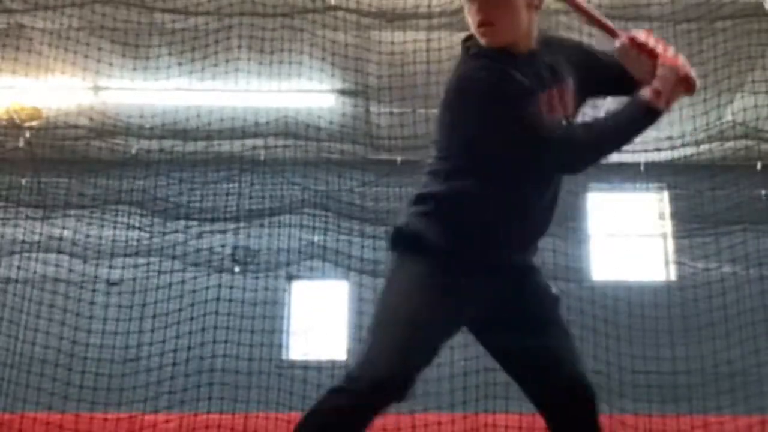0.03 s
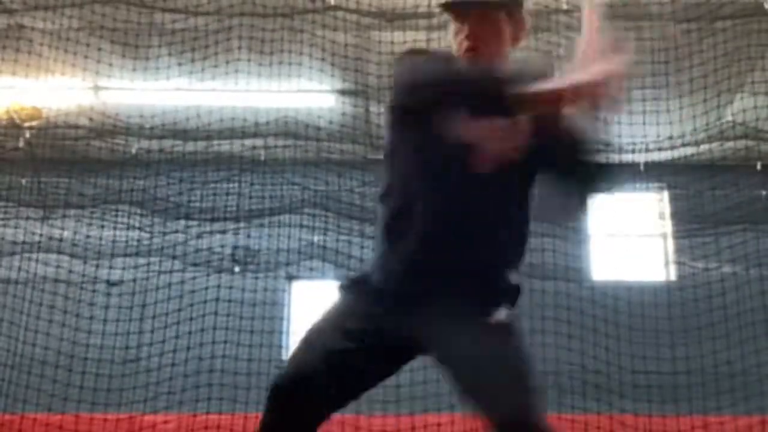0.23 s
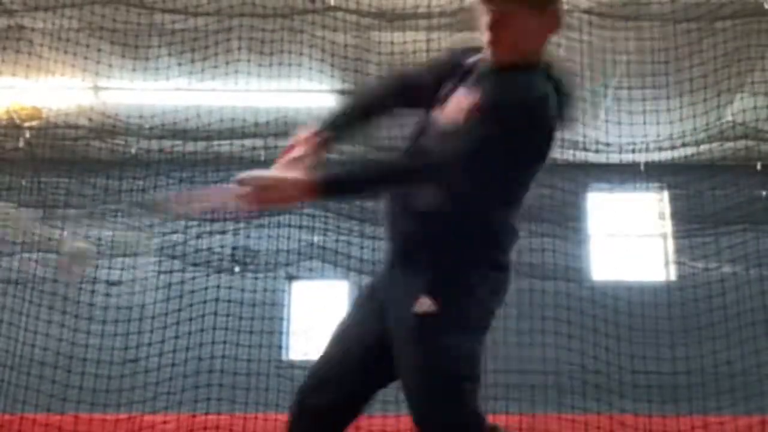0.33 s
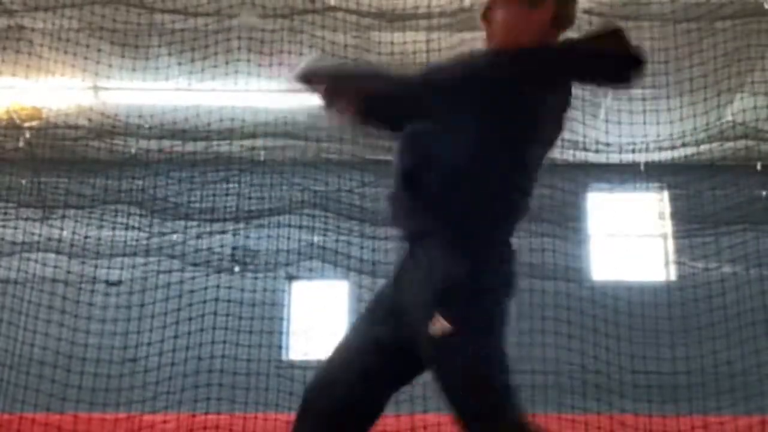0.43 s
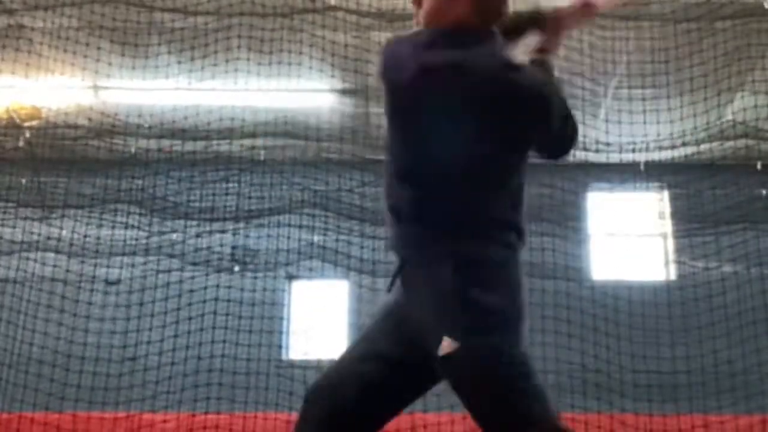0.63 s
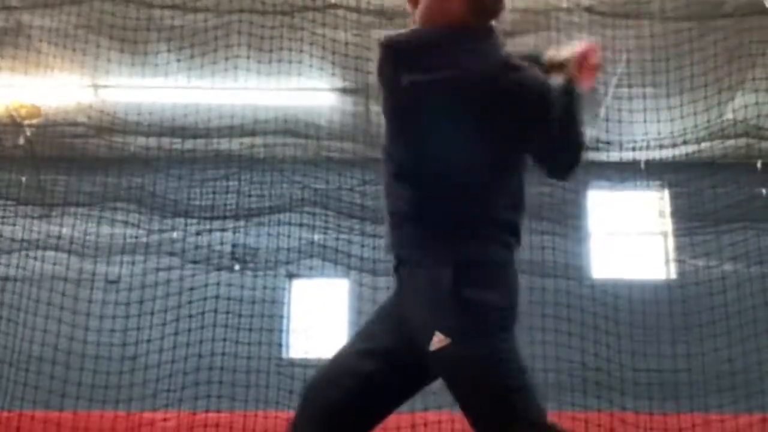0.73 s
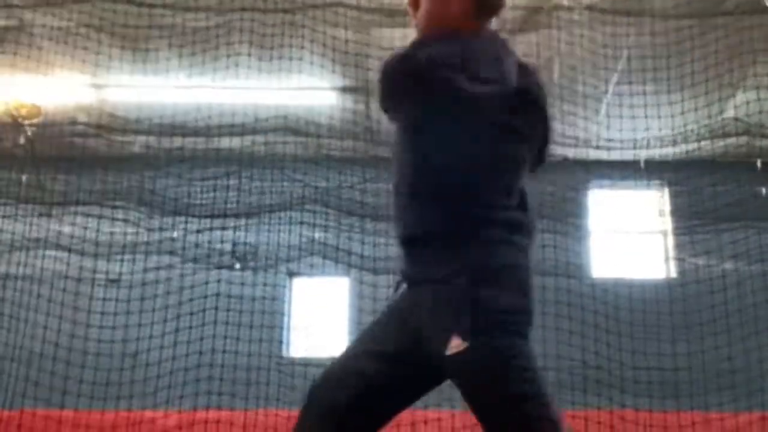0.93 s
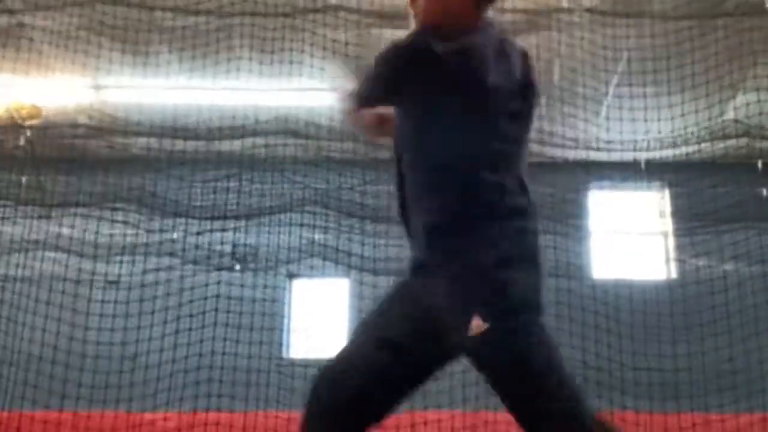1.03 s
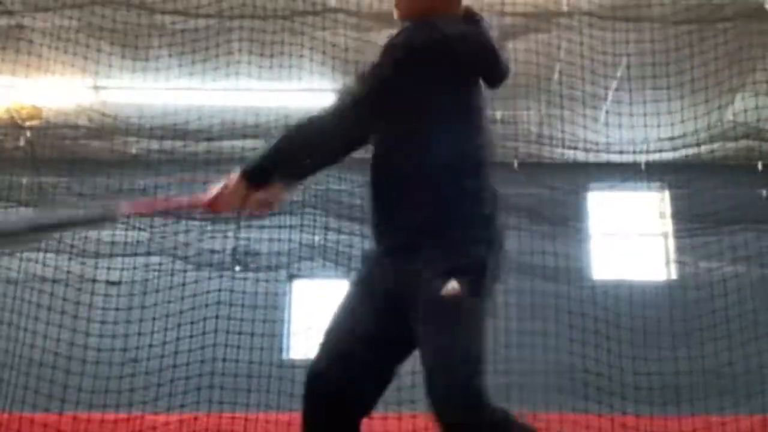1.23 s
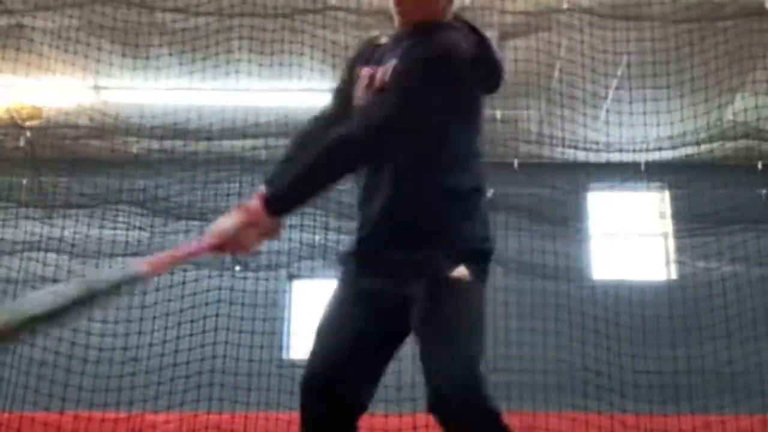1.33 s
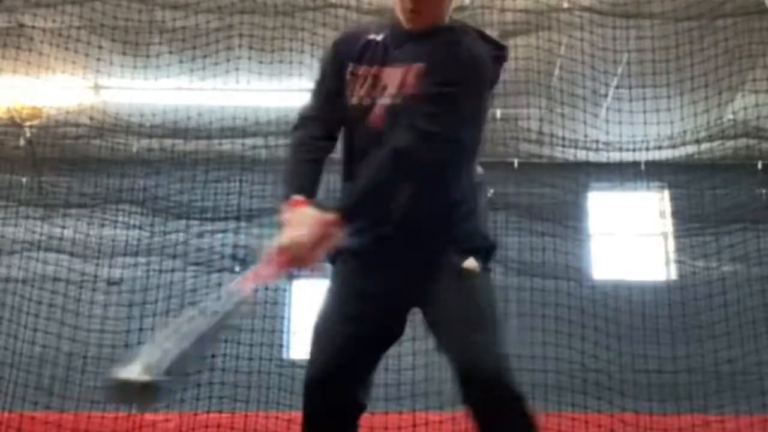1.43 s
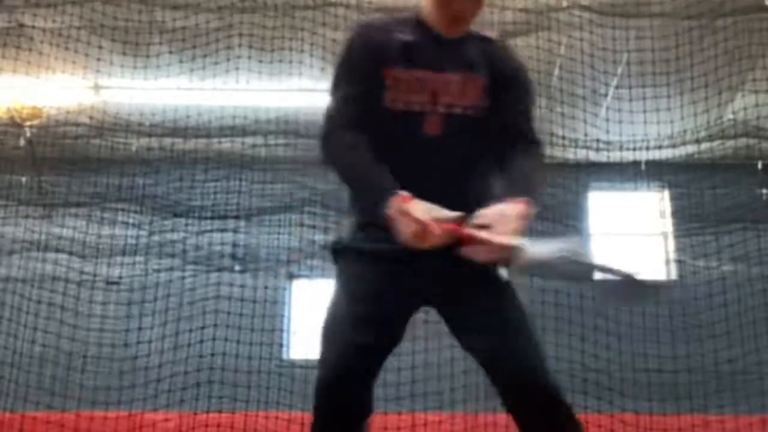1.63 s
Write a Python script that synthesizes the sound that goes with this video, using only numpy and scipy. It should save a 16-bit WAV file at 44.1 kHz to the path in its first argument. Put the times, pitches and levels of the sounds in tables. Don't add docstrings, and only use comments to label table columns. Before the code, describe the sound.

A bat cracks sharply against a ball in a netted indoor cage, ringing through the hall

```python
import sys
import numpy as np
from scipy import signal
from scipy.fft import rfft, irfft, next_fast_len
from scipy.io import wavfile

SR = 44100
rng = np.random.default_rng(int(sys.argv[2]) if len(sys.argv) > 2 else 0)


def bounce(signal):
    frames = np.transpose(np.atleast_2d(signal))
    limited = np.clip(frames, -1, 1)
    pcm = np.round(limited * 32767).astype(np.int16)
    wavfile.write(sys.argv[1], SR, pcm)


def volts_from_db(level):
    exponent = np.asarray(level, float) / 20
    return 10 ** exponent


N = 74970


def at_hz(points, hz):
    curve_hz, value = np.transpose(points)
    return np.interp(np.log(hz), np.log(curve_hz), value)


def drift(rate_hz):
    hop = 40
    pole = np.exp(-2 * np.pi * rate_hz * hop / SR)
    noise = rng.standard_normal(N // hop + 2002)
    slow = signal.lfilter([1], [1, -2 * pole, pole * pole], noise)[2000:]
    return np.interp(np.arange(N) / hop, np.arange(len(slow)), slow / slow.std())


def banded_noise(spectrum, patchy_db, envelope):
    # (frequency [Hz], correlation [-1..1])
    ear_likeness = [(60, 0.99), (180, 1), (550, 0.47), (1650, 0.21), (4970, -0.31), (15000, 0.53)]
    # (frequency [Hz], level [dB])
    ear_balance = [(60, -2), (180, 1.5), (550, 2), (1650, 3), (4970, 2), (15000, -2)]
    out, power = 0, 0
    edges = 22 * 2 ** np.arange(0, 9.6, 0.5)
    white = rng.standard_normal((2, 2, N + 4000))
    common_flicker = drift(4.7)
    for k, (low, high) in enumerate(zip(edges, edges[1:])):
        band = signal.butter(2, [low, high], "band", fs=SR, output="sos")
        mid, side = signal.sosfilt(band, white[k % 2])[:, 4000:]
        hz = np.sqrt(low * high)
        alike = np.clip(at_hz(ear_likeness, hz), -1, 1)
        level = volts_from_db(at_hz(spectrum, hz))
        power += level ** 2 * (high - low) * 2 / SR
        lean = volts_from_db(at_hz(ear_balance, hz) * np.array([[0.5], [-0.5]]))
        flicker = volts_from_db(patchy_db * (0.26 * common_flicker + drift(68)))
        stereo = np.sqrt(1 + alike) * mid + np.sqrt(1 - alike) * side * [[1], [-1]]
        out = out + level * envelope(hz) * flicker * lean * stereo
    return out / np.sqrt(power)


def blows(rows, rough, apart, share=0.13):
    length = 8192
    out = np.zeros((2, N + SR))
    for s, db, hz, ms, *pan_db in rows:
        start, tau = int(s * SR), ms / 1000
        left_lag_s = 0.00006 * min(1, (2500 / hz) ** 2)
        t = np.maximum(np.arange(length) / SR - [[left_lag_s], [0]], 0)
        pole = np.exp(-2 * np.pi * share * hz / SR)
        noise = rng.standard_normal((3, length + 1000))
        ear_noise = apart * noise[1:] + noise[0]
        wobble = signal.lfilter([1], [1, -2 * pole, pole * pole], ear_noise)[:, 1000:]
        phase = 2 * np.pi * hz * t + rough * wobble / wobble.std()
        pan = pan_db[0] if pan_db else 0.3
        lean = volts_from_db(pan * np.array([[0.5], [-0.5]]))
        swell = (t / tau * np.exp(1 - t / tau)) ** 1.12
        out[:, start:start + length] += volts_from_db(db) * lean * swell * np.sin(phase)
    return out[:, :N]


def crack():
    # (time [s], peak level [dB], frequency [Hz], decay [ms], pan [dB])
    crack_parts = [(.2300, -18, 1390, 2.4, -6), (.2349, -5, 2830, 0.58, 2.5), (.2351, -11.5, 6500, 0.21, 4),
                   (.2351, -22, 8600, 0.19, -5.5), (.2366, -5, 1027, 1.11, 3), (.2385, -9, 343, 1.15, -1.5),
                   (.2385, -13, 1690, 2.24, 3), (.2372, -14, 620, 0.53, 5.5), (.2388, -22.5, 4700, 1.4, 1),
                   (.2390, -23.5, 10100, 0.23, -10.5), (.2400, -14, 2380, 1.3, 9.5),
                   (.2555, -12.5, 2510, 1.46, 1), (0.23, -32.5, 7000, .6, 0.0),
                   (.2555, -36.5, 11000, 0.71, 1), (.2605, -34.5, 7700, .8, 3),
                   (.2425, -27.5, 4800, .6, -1.5), (.2470, -22, 2800, 1.1, -3.5),
                   (.2575, -25, 1253, 1.6, 5), (.2600, -28, 4800, 1.3, -1.5), (.2850, -21.5, 2570, 3.6, 8),
                   (.2860, -22.5, 4597, 1.4, 4), (.2790, -35.5, 4500, 1, 1), (.2880, -31.5, 5700, 1.5, 0.0),
                   (.2890, -38, 8850, 0.84, -1), (.2870, -32, 920, 8.3, 5), (.4115, -28.5, 3400, 1.6, 8),
                   (0.37, -40, 8500, .7, -3), (.4285, -40, 8500, .7, 0.0), (.2260, -33, 6900, 3.5, 0.0),
                   (.3280, -32, 2900, 1.5, -1), (.4280, -35, 4500, 1.3, 11.5)]
    return blows(crack_parts, rough=0.75, apart=0.3, share=0.3)


def swing():
    # (frequency [Hz], density [dB per Hz])
    rush_spectrum = [(200, 3.5), (600, -4.5), (2000, -15), (6000, -21), (11000, -32.5), (15000, -57)]
    # (frequency [Hz], density [dB per Hz])
    whip_spectrum = [(700, -21.5), (1400, 4.5), (2200, -5), (3300, -1), (5600, -7.5), (7000, -9),
                     (8500, -29.5), (15000, -50.5)]
    contact_s = 0.2373
    age = np.arange(N) / SR - contact_s

    def swell(peak_db, rise_db_per_s):
        return volts_from_db(peak_db + np.where(age < 0, rise_db_per_s * age, -2500 * age))

    rush, whip = swell(-33.5, 294), swell(-21, 1300)
    out = banded_noise(rush_spectrum, patchy_db=2.5, envelope=lambda hz: rush)
    return out + banded_noise(whip_spectrum, patchy_db=1.0, envelope=lambda hz: whip)


def hall():
    # (frequency [Hz], density [dB per Hz])
    hall_spectrum = [(120, -12.5), (200, -1.5), (804, -6), (998, -1.5), (3170, -7.5), (7020, -22),
                     (11000, -47), (12100, -53), (15000, -59)]
    # (frequency [Hz], decay time [s])
    hall_decay = [(200, 1.1), (1000, 1.1), (3000, 1.15), (8000, 0.47), (14000, 0.34)]
    # (time [s], level [dB], build-up [ms], tilt [dB per octave], share of decay time [1])
    hall_blows = [
        (.238, -31, 1.3, 2.5, 0.77),
        (0.289, -35.5, 2.7, 0.5, 1.204),
        (0.256, -27.5, 0.88, 6.5, 0.045),
        (0.282, -32, 1.8, 3, 0.15),
        (0.409, -40, 3.3, 6.5, 0.6),
        (.652, -32.5, 4.7, -2.5, 0.096),
        (0.818, -50.5, 1.7, -7.5, 0.22),
    ]
    # (time [s], level [dB], build-up [ms], tilt [dB per octave], share of decay time [1])
    far_blows = [
        (0.023, -48, 0.86, 2, 1.8),
        (0.995, -44.5, 4.3, -0.5, 0.18),
        (1.042, -52, 9, 3, 0.22),
        (1.174, -45.5, 1.9, 3, 0.07),
    ]
    t = np.arange(N) / SR

    def envelope(hz):
        power = 0
        far_cut_db = -12 * (hz > 2900)
        far = [(s, db + far_cut_db, *rest) for s, db, *rest in far_blows]
        for s, db, build_ms, tilt_db, share in [*hall_blows, *far]:
            age = np.maximum(t - s, 0)
            fall_db = -60 * age / (share * at_hz(hall_decay, hz))
            build = 1 - np.exp(-age * 1000 / build_ms)
            power = power + (volts_from_db(db + tilt_db * np.log2(hz / 1500) + fall_db) * build) ** 2
        return np.sqrt(power)

    return banded_noise(hall_spectrum, patchy_db=1.58, envelope=envelope)


def ball_knocks():
    # (time [s], peak level [dB], frequency [Hz], decay [ms], pan [dB])
    knock_parts = [(.0270, -36.5, 1667, 3.5, 0), (.0270, -35, 268.4, 9.5, 0), (.6450, -51, 4020, 2.3, 13),
                   (.6520, -26.5, 502, 3.7, 14), (.6540, -26, 425, 7.8, 3), (.6520, -27, 165, 5, 0.5),
                   (.6560, -20, 2098, 1.77, 1), (.6570, -32.5, 2723, 6.1, 2.5),
                   (.6530, -26.5, 224.6, 10.5, -1.5), (.8195, -37.5, 3650, 0.51, 4),
                   (.8210, -41, 2350, 4.3, 4), (.8220, -30, 635, 7.1, -5), (.8300, -28.5, 317.3, 8, 9.5),
                   (.8310, -53, 7450, 0.79, 1), (.8860, -33.5, 281.9, 3.8, 2),
                   (1.0860, -47.5, 590, 7.3, -0.5), (1.1760, -50.5, 1810, 2.2, -1),
                   (.0270, -38.5, 732, 2.6, 1), (1.1760, -48, 630, 2.5, 13.5), (.6600, -36.5, 858, 4.5, -4),
                   (.6600, -41.5, 1134, 7.3, 2), (.6580, -41, 2530, 4.4, 5), (.6870, -41.5, 2280, 1.8, 3),
                   (.8230, -35, 523, 7.6, 3), (.8250, -41, 850, 6, 0.0), (.8240, -37, 450, 3.2, 3)]
    return blows(knock_parts, rough=0.75, apart=0.79)


def metal_frame():
    # (time [s], peak level [dB], frequency [Hz], decay [ms])
    frame_modes = [
        (.660, -60, 5120, 20),
        (.660, -59.5, 5950, 11.0),
        (.660, -60, 6840, 14),
        (.658, -58, 4170, 8.1),
        (.660, -64, 4700, 14),
        (.660, -70, 5500, 10),
        (.660, -62, 6550, 9.0),
        (.660, -63, 6270, 8.1),
    ]
    return blows(frame_modes, rough=0.45, apart=0.88, share=0.02)


def foot_thuds():
    # (time [s], peak level [dB], frequency [Hz], decay [ms])
    floor_booms = [(.183, -27, 81.7, 11), (.205, -24, 85, 16), (.232, -21.5, 80, 6.2),
                   (.52, -35.5, 75.5, 13), (.575, -36, 72.5, 9.4), (.648, -24, 71.5, 2.5),
                   (1.270, -18, 121, 7.2), (1.274, -32.5, 244, 6.5), (1.300, -31.5, 187.6, 13.8),
                   (1.298, -23.5, 98, 7.4), (1.360, -29, 111, 6.6), (1.382, -24.5, 98.4, 9.9),
                   (1.415, -30, 98.6, 21), (1.420, -38, 188.7, 16), (1.495, -22.5, 110.8, 15.4),
                   (1.502, -25, 175.7, 8.9), (1.510, -34, 281.4, 13.2), (1.535, -25.5, 113.4, 9.7),
                   (1.588, -27.5, 111, 6.6), (1.610, -35, 183, 21), (1.650, -39, 100.6, 15)]
    return blows(floor_booms, rough=0.4, apart=0.13)


def ticks():
    # (time [s], peak level [dB], frequency [Hz], decay [ms], pan [dB])
    tick_parts = [(.130, -51, 4260, 1.5, -1), (.132, -55.5, 6960, 1.3, 2), (.204, -40, 700, 2.4, 1),
                  (.6565, -54, 7630, 1, 0.0), (.8195, -53.5, 5100, 0.48, 3), (.8205, -60, 7920, .6, 0),
                  (.8205, -65, 10900, .6, 0), (.8262, -58.5, 9470, 0.67, 3), (1.174, -54, 3500, 2.2, 0.0),
                  (1.214, -60, 4730, 1.3, 2), (1.214, -54.5, 3320, 3.7, 2), (1.222, -56, 4300, 3, 0),
                  (1.230, -58.5, 3320, 12, 0.0), (1.264, -52, 3880, 1.8, 4), (1.264, -53, 1200, 1.3, 4),
                  (1.272, -52, 3340, 7, -0.5), (1.303, -54.5, 3450, 8.4, 5), (1.400, -54.5, 2116, 9.6, -1),
                  (1.596, -59, 3640, 4.1, 0)]
    return blows(tick_parts, rough=1.1, apart=0.98)


def clothes():
    # (time [s], level [dB])
    rustle = [
        (1.19, -70),
        (1.212, -63),
        (1.218, -61),
        (1.32, -57),
        (1.345, -60),
        (1.399, -58.5),
        (1.52, -51),
        (1.60, -58),
        (1.7, -69.5),
    ]
    # (frequency [Hz], density [dB per Hz])
    cloth_spectrum = [(300, 5.5), (500, -3.5), (1000, -6), (2200, -12.5), (3500, -11.5), (5000, -14.5),
                      (9500, -34), (12000, -60)]
    s, db = np.transpose(rustle)
    loudness = volts_from_db(np.interp(np.arange(N) / SR, s, db, left=-120) + 6)
    low_cut = signal.butter(2, 350, "high", fs=SR, output="sos")
    return signal.sosfilt(low_cut, banded_noise(cloth_spectrum, patchy_db=2.5, envelope=lambda hz: loudness))


def ventilation():
    # (frequency [Hz], density [dB per Hz])
    air_spectrum = [(15, -33), (25, -7.5), (91, 4), (407, -18.5), (615, -36.5), (700, -26.5), (2360, -36.5),
                    (8800, -54), (12000, -77), (15600, -103), (22000, -120)]
    return banded_noise(air_spectrum, patchy_db=-0.5, envelope=lambda hz: volts_from_db(-47.5))


def ports(x, mid_points, side_points):
    size = next_fast_len(N + 4096)
    hz = np.maximum(np.fft.rfftfreq(size, 1 / SR), 1)

    def colour(v, points):
        return irfft(rfft(v / 2, size) * volts_from_db(at_hz(points, hz)), size)[:N]

    mid = colour(x[0] + x[1], mid_points)
    side = colour(x[0] - x[1], side_points)
    return np.array([mid + side, mid - side])


def scene():
    # (frequency [Hz], level [dB])
    near_mid = [(9000, 0.0), (12000, 1), (15500, -5)]
    near_side = [(9000, 3), (12000, 7.5), (15500, 9.5)]
    # (frequency [Hz], level [dB])
    diffuse_mid = [(10000, 0.0), (11500, 1), (13000, -25.5), (15500, -41.5)]
    diffuse_side = [(5200, -0.5), (6000, -28), (8300, -30), (9300, 0.5), (11000, 3), (13000, 16.5),
                    (15500, 16.5)]
    near = crack() + foot_thuds() + ticks()
    diffuse = swing() + hall() + ball_knocks() + metal_frame() + clothes() + ventilation()
    return ports(near, near_mid, near_side) + ports(diffuse, diffuse_mid, diffuse_side)


def band_limit(x):
    return signal.sosfilt(signal.butter(12, 15750, fs=SR, output="sos"), x)


def record(dry):
    low_cut = signal.butter(2, 45, "high", fs=SR, output="sos")
    top_cut = signal.cheby2(12, 70, 17000, fs=SR, output="sos")
    mic_roll_off = signal.butter(2, 12400, fs=SR, output="sos")
    x = np.tanh(dry)
    for stage in (low_cut, top_cut, mic_roll_off):
        x = signal.sosfilt(stage, x)
    return band_limit(x)


dry = scene()
out = record(dry)
bounce(out)
```